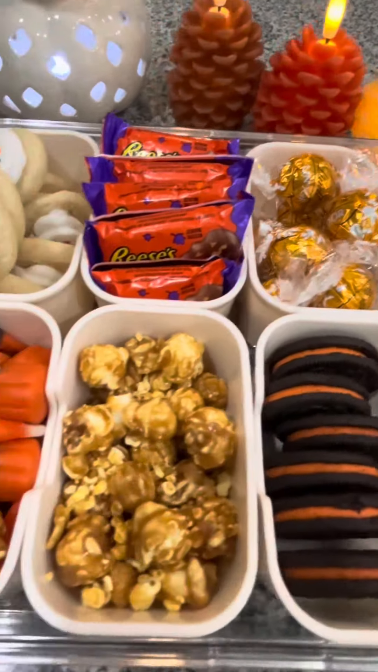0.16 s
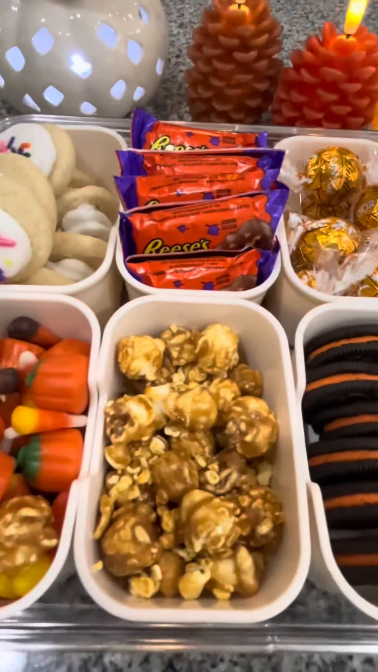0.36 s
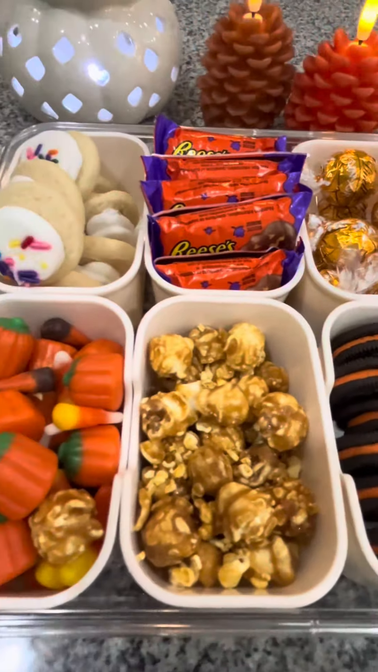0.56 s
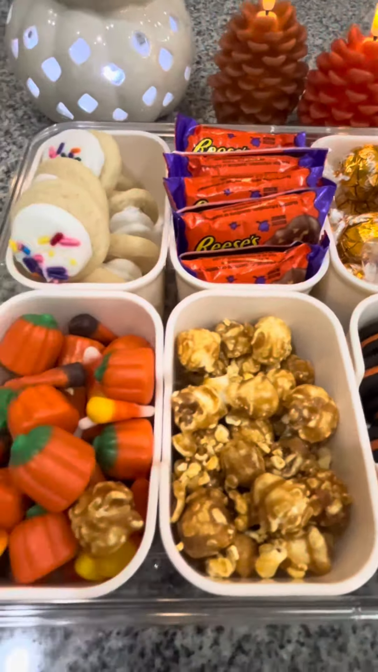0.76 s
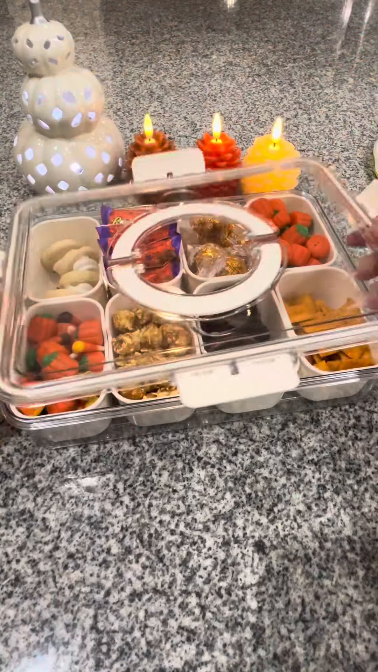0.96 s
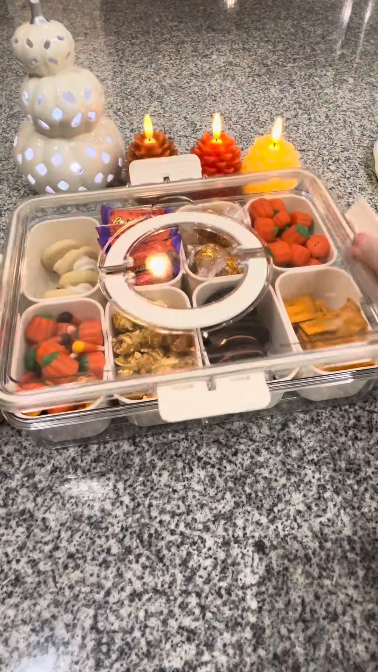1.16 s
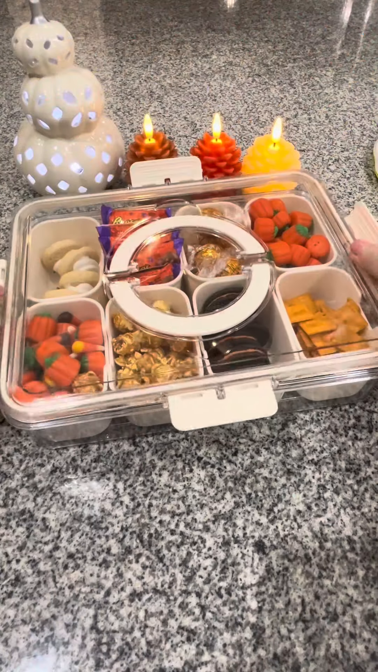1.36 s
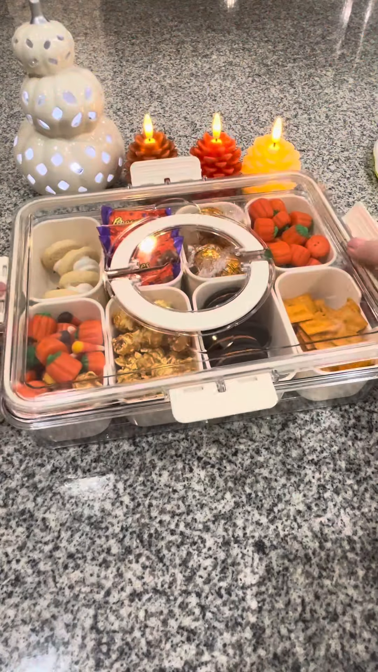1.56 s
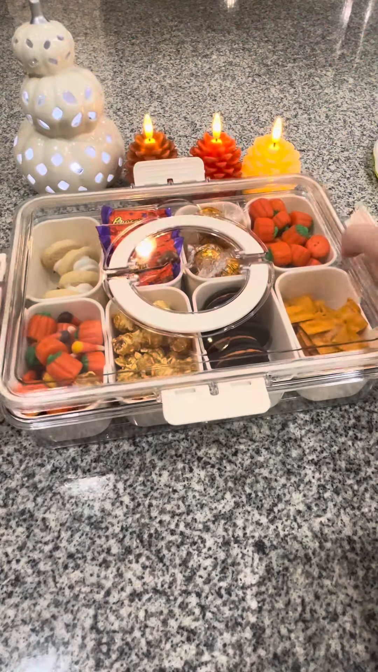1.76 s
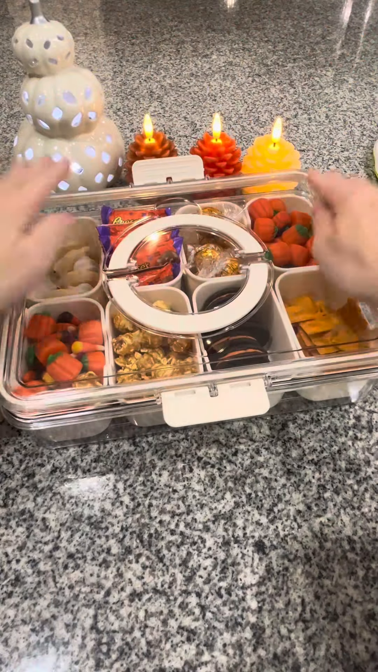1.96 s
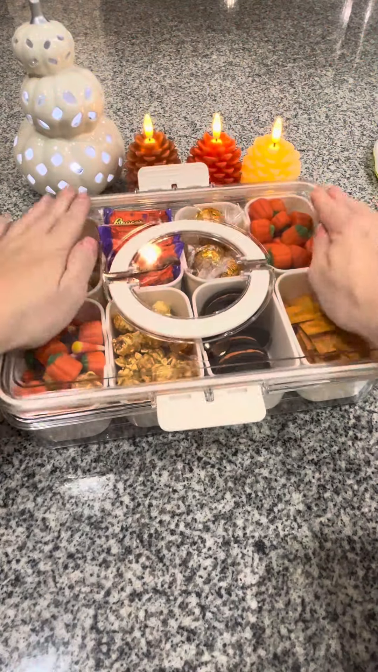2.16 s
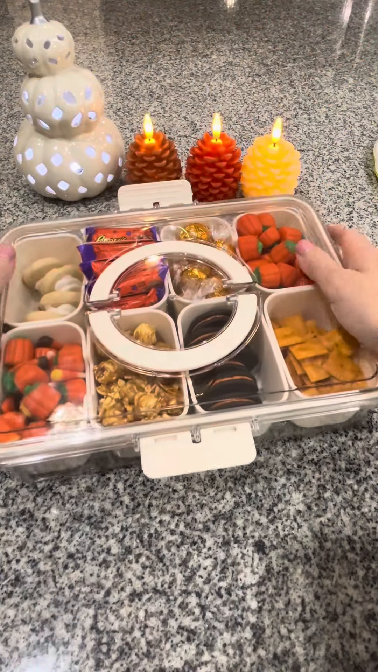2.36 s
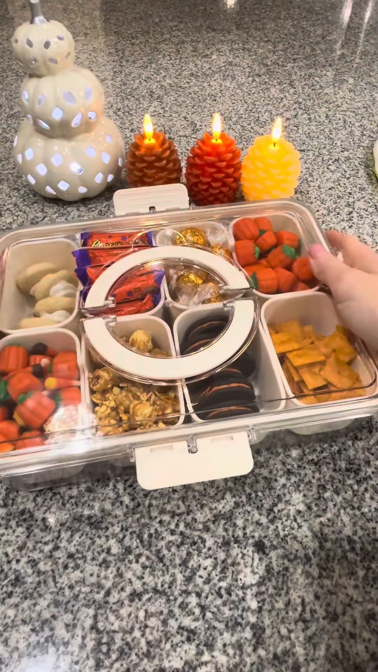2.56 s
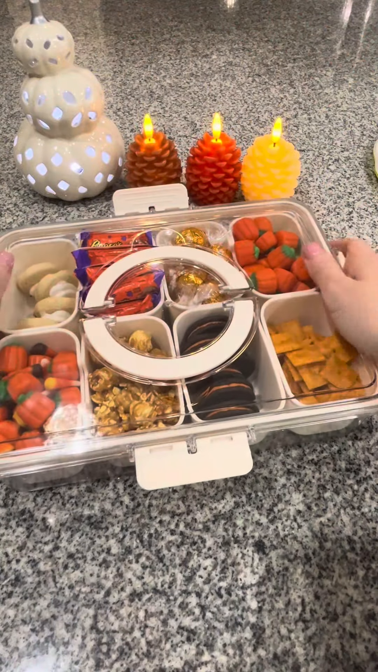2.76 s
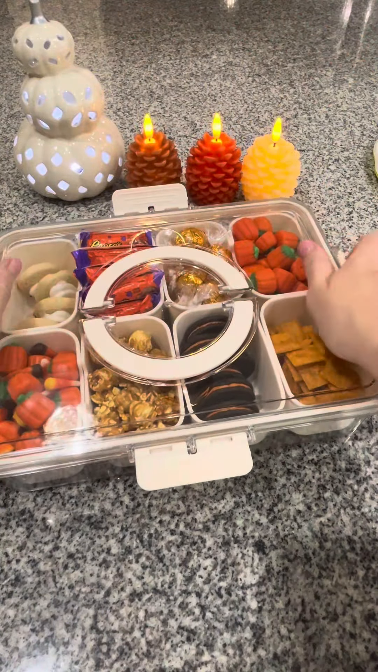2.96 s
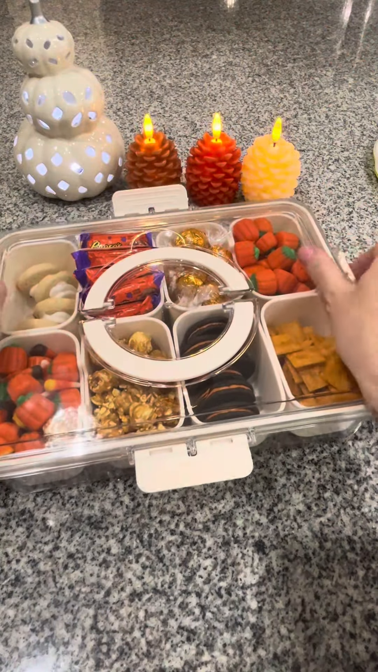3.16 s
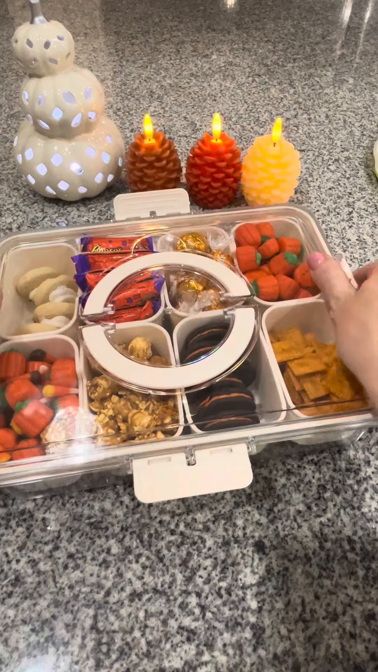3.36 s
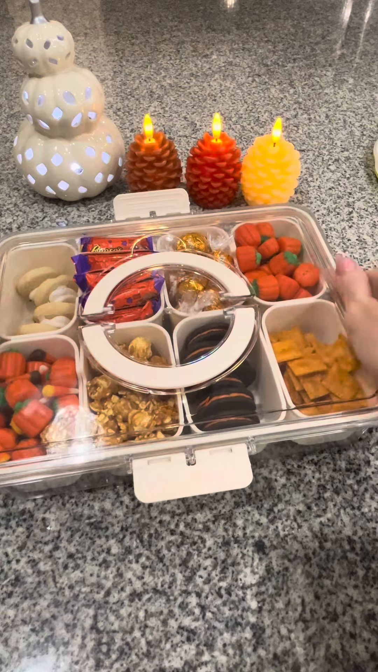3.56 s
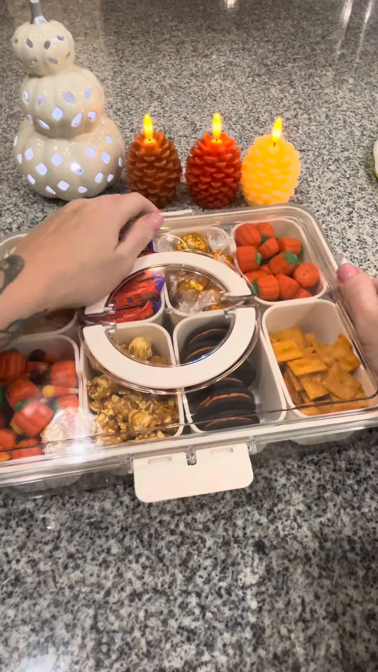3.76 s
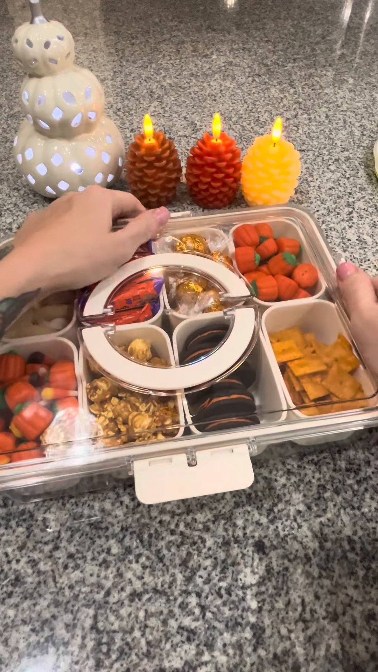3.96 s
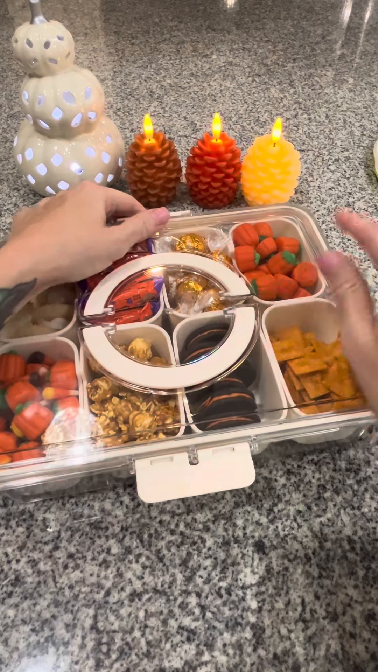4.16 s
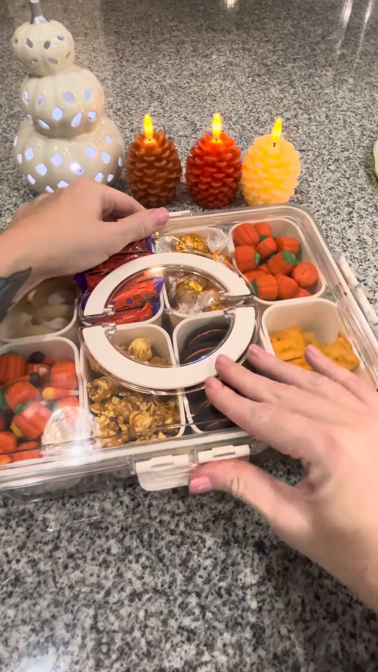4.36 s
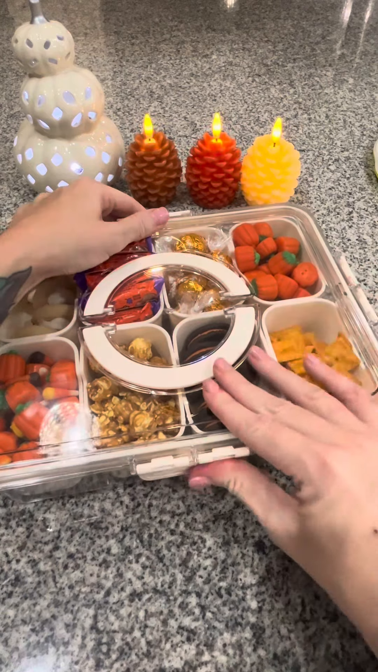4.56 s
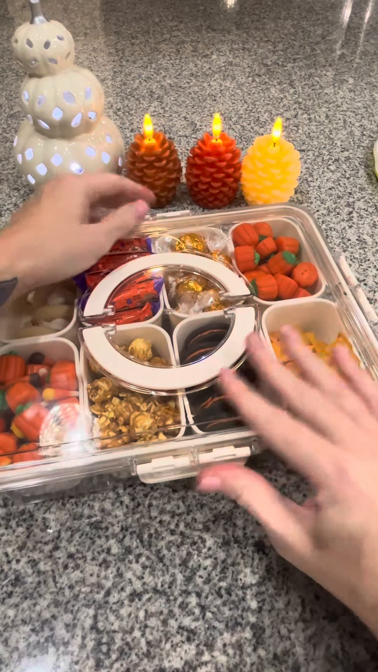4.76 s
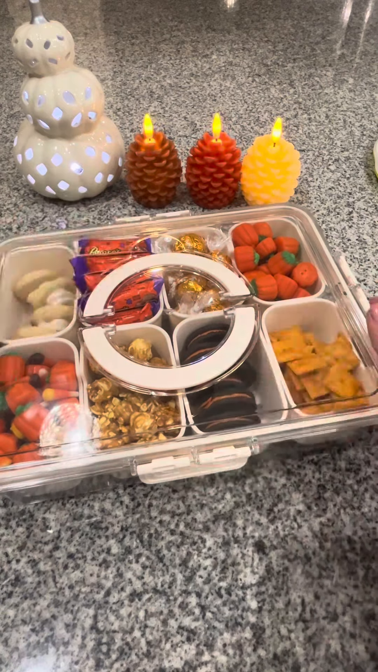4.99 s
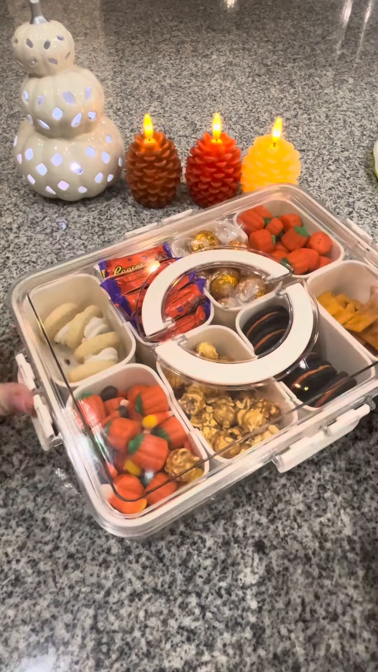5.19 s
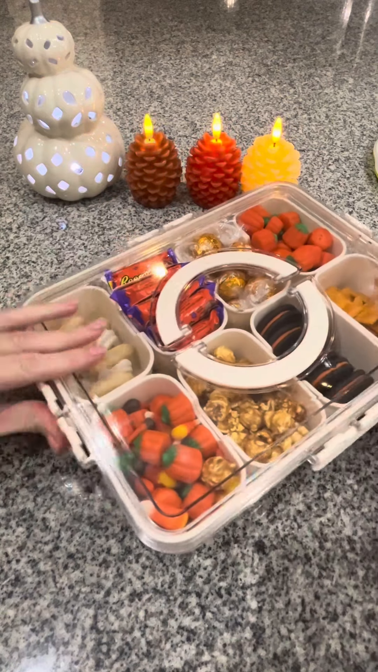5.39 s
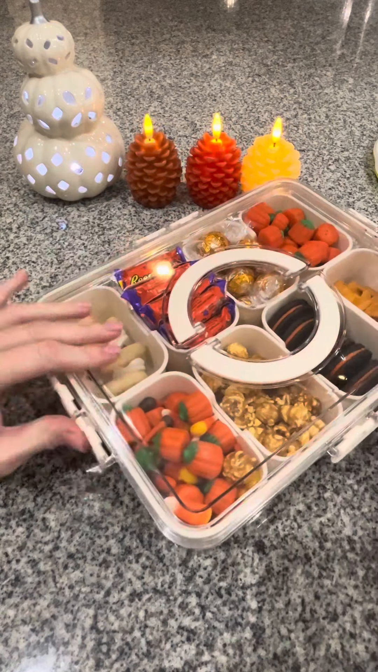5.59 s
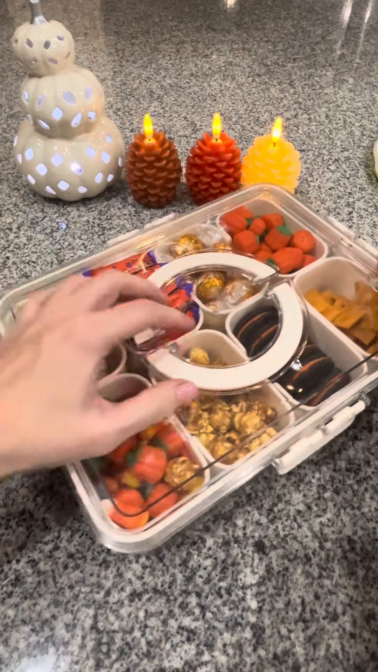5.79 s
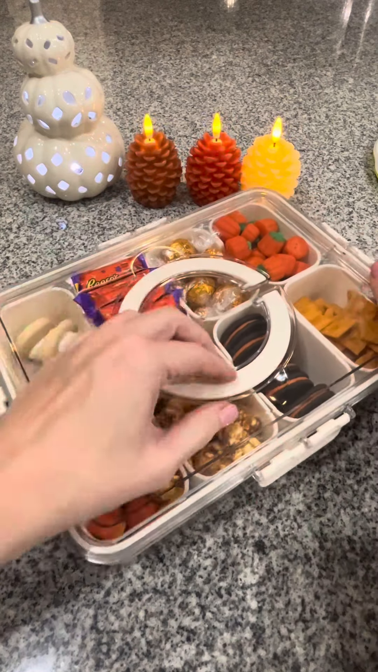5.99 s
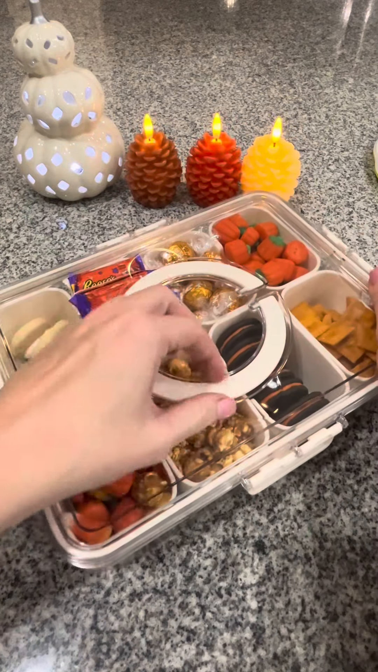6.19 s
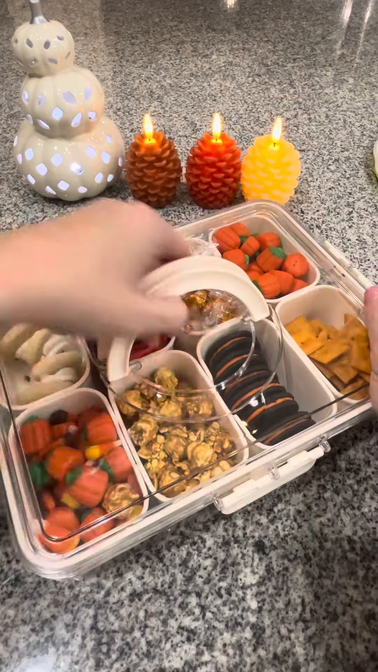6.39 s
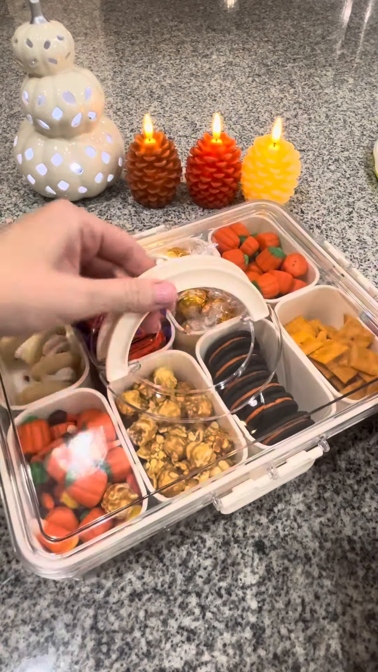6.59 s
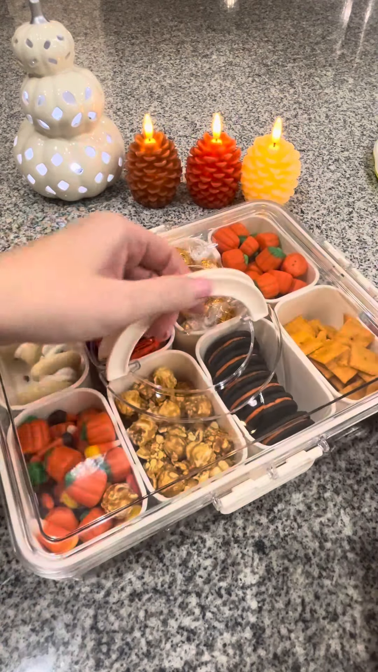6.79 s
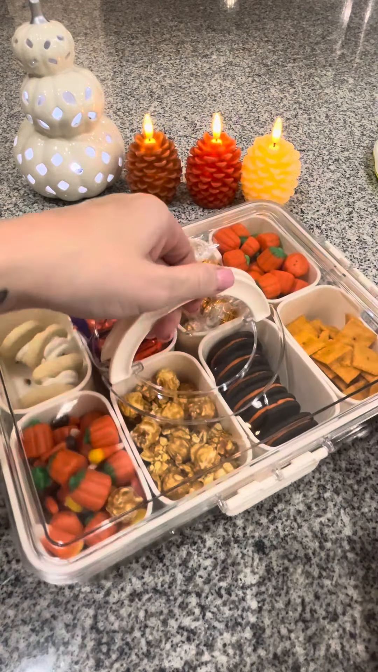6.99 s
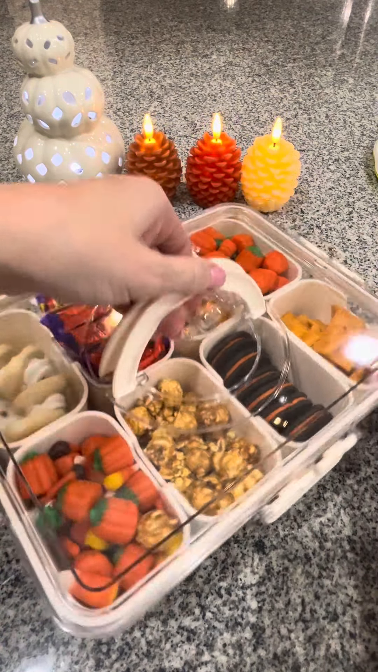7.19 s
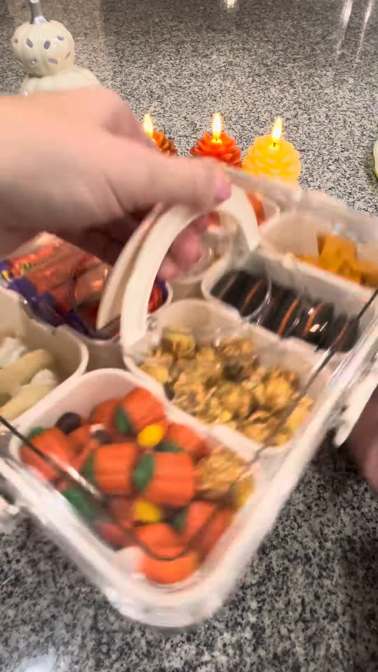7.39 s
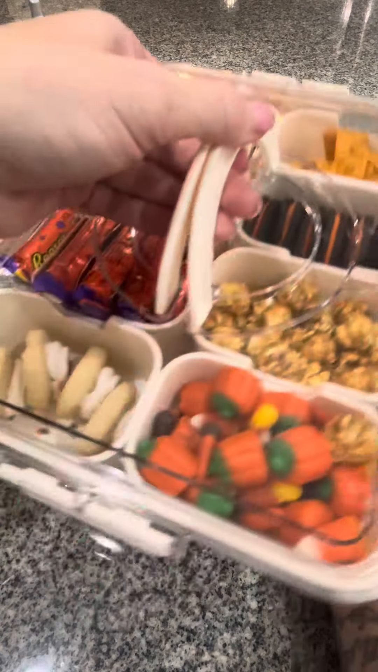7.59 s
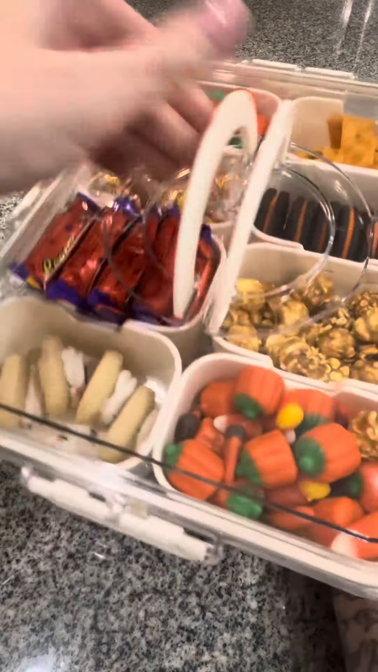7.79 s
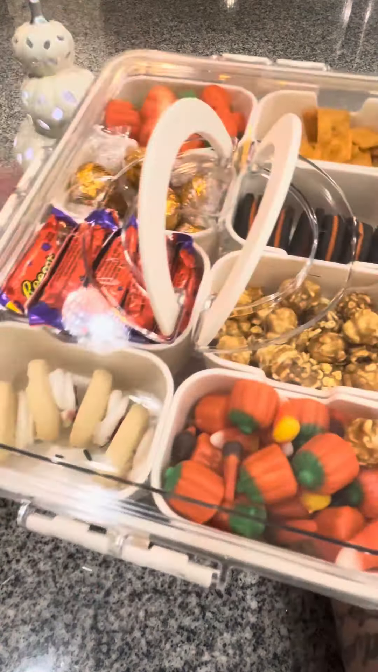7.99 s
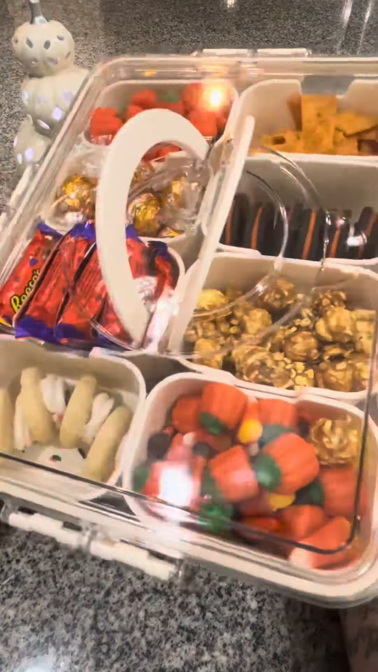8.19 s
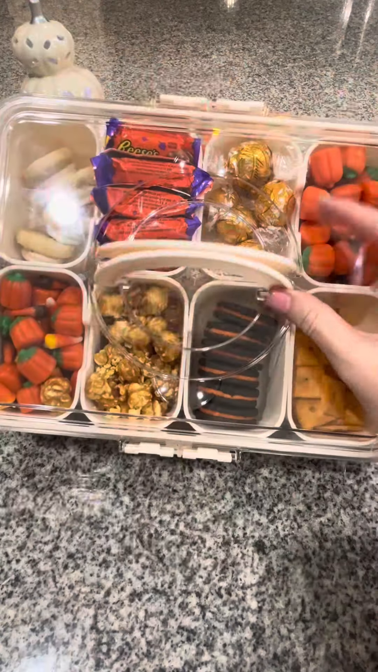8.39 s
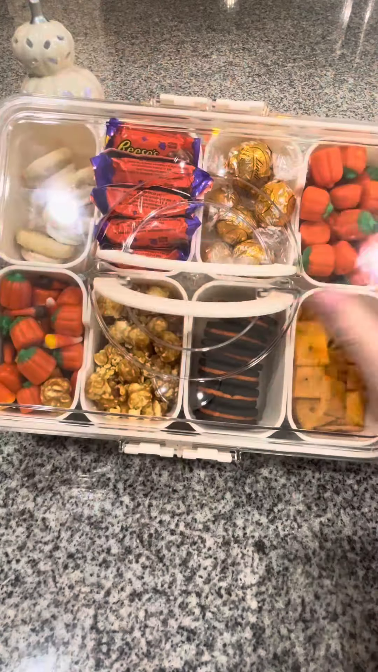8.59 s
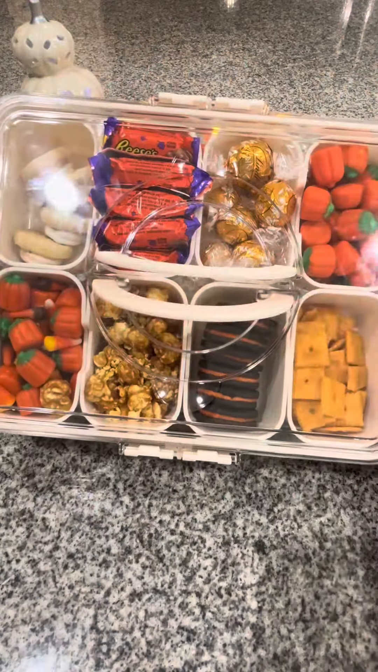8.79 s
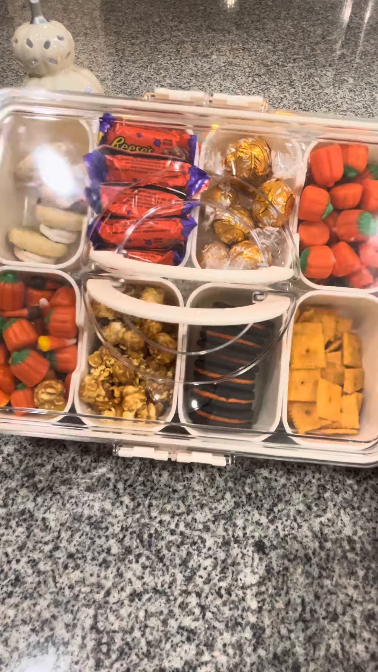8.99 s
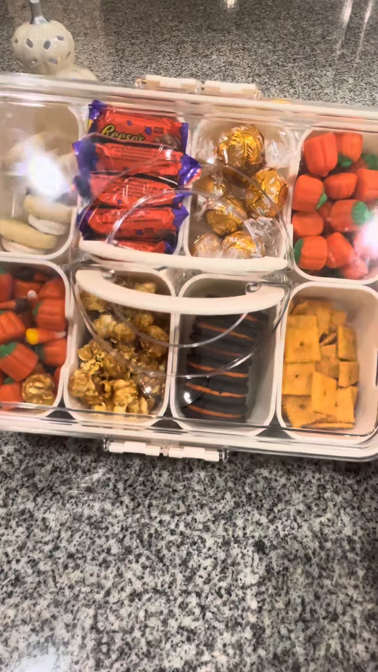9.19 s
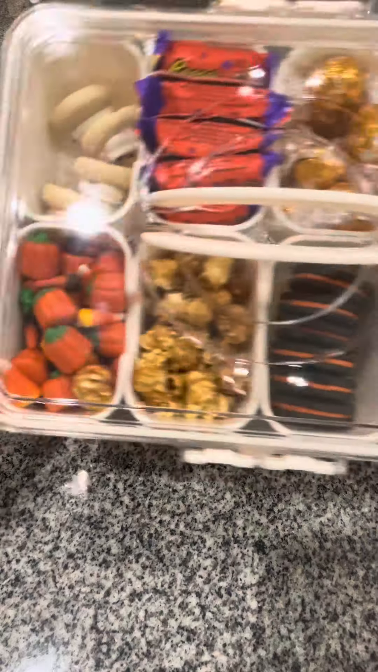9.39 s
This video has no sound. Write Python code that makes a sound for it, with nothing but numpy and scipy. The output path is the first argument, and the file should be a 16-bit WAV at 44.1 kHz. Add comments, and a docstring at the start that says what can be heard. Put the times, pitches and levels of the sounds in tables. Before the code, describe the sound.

A hard plastic box lid is wiggled on and latched with loud snaps, then the box is turned, lifted and set down in a quiet kitchen.

```python
"""A clear plastic snack box on a stone counter, close to a phone in a quiet kitchen. Its lid is laid on and
wiggled home, its latches snap shut, it is turned and lifted by its folding handles, then set down again.
Each contact flexes the box (a falling knock), sounds a wall mode (clack), and cracks and rings its thin
shell (click). Rubbing is a dense run of tiny noise slips. Decaying noise is the room's answer; coloured
noise and a wavering sine are the low rumble and hum behind it."""
import sys
import numpy as np
from scipy import signal
from scipy.fft import rfft, irfft
from scipy.io import wavfile
from scipy.ndimage import uniform_filter1d

SR = 44100
rng = np.random.default_rng(int(sys.argv[2]) if len(sys.argv) > 2 else 0)


def bounce(signal):
    """Save signal as a 16-bit WAV file at the path given by the first command-line argument."""
    frames = np.transpose(np.atleast_2d(signal))
    limited = np.clip(frames, -1, 1)
    pcm = np.round(limited * 32767).astype(np.int16)
    wavfile.write(sys.argv[1], SR, pcm)


N = 416744
TIME = np.arange(N) / SR
CONTACT_SAMPLES = 4096
AGE = np.arange(CONTACT_SAMPLES) / SR  # seconds since the touch

# Strokes of rubbing on stone, plastic and skin. Each row: start in seconds, end in seconds, scrape in dB,
# hiss in dB, hiss centre in Hz, spread of slip sizes in dB (skin is smooth, plastic crackles).
STROKES = [(0.892, 1.008, -70.5, -72, 7140, 3), (0.879, 1.008, -65, -80, 2300, 5),
           (1.095, 1.219, -50.5, -53, 5000, 3.5), (1.172, 1.248, -42.5, -55, 5195, 8),
           (1.237, 1.505, -53.5, -68, 4800, 8), (1.469, 1.809, -51, -67, 4000, 8.5),
           (1.922, 2.073, -33, -44.5, 6000, 6), (2.045, 2.21, -45.5, -78, 4500, 5.2),
           (2.253, 2.516, -54.5, -72, 3810, 1.8), (2.597, 3.009, -54, -72, 3360, 4),
           (3.04, 3.219, -52, -68, 2198, 5), (3.132, 3.237, -47, -61, 7000, 5.3),
           (3.399, 3.538, -52.5, -75, 7940, 1.6), (3.553, 3.742, -47, -64, 6910, 2.4),
           (3.944, 4.154, -52, -69, 3500, 3.7), (4.057, 4.11, -58.5, -61.5, 3114, 5),
           (4.049, 4.133, -65, -66.5, 7870, 4), (4.454, 4.851, -55, -73.5, 3290, 2.4),
           (4.645, 4.765, -62, -71.5, 7900, 2), (4.722, 5.014, -65.5, -77.5, 3320, 4),
           (4.823, 4.936, -69, -72, 7980, 2), (4.955, 5.095, -50, -70, 8000, 2),
           (5.152, 5.362, -54, -74, 4500, 2.2), (5.35, 5.73, -45, -66.5, 3482, 4.9),
           (5.709, 5.938, -55.5, -78, 4700, 5), (6.158, 6.541, -56, -65.5, 4630, 5.6),
           (6.333, 6.518, -51.5, -62, 8400, 2.5), (6.479, 6.971, -61, -88, 3300, 2.3),
           (6.612, 6.863, -71, -72, 9000, 2.8), (6.832, 7.05, -63, -82.5, 4200, 2.7),
           (7.279, 7.628, -59.5, -72.5, 1500, 4.3), (7.633, 7.77, -56.5, -68.5, 9500, 2),
           (7.789, 7.881, -56.5, -87, 1290, 2.6), (8.896, 9.009, -62.5, -85, 7000, 2)]


def undb(db):
    """Decibels to gain."""
    return 10 ** (np.asarray(db) / 20)


def unit(x):
    """Scale to rms 1."""
    return x / np.sqrt(np.mean(x ** 2) + 1e-20)


def along(points, size, axis=1):
    """One column of a frequency table, read at the bins of a transform on a log-frequency scale."""
    table = np.array(points, float)
    bins_hz = np.fft.rfftfreq(size, 1 / SR)
    return np.interp(np.log(bins_hz + 1), np.log(table[:, 0]), table[:, axis])


def colour(x, points):
    """Filter by a (Hz, dB) spectrum."""
    size = x.shape[-1]
    return irfft(rfft(x) * undb(along(points, size)), size)


def band(x, low_hz, high_hz):
    """Causal band-pass."""
    return signal.sosfilt(signal.butter(2, [low_hz, high_hz], "band", fs=SR, output="sos"), x)


def walk(rate_hz):
    """Smooth random drift of spread near 1."""
    hold = int(SR / rate_hz)
    steps = np.repeat(rng.standard_normal(N // hold + 1), hold)
    return 1.3 * uniform_filter1d(steps, hold)[:N]


def stereo_noise(size, apart_db=-5):
    """Two noises that are mostly alike: the wide shell radiates a little differently towards each port."""
    common, left, right = rng.standard_normal((3, size))
    return common + undb(apart_db) * np.array([left, right])


def blow(x, db):
    """Give a strike the energy of a 14 ms burst at this rms level."""
    energy = np.sum(x ** 2, axis=-1, keepdims=True)
    return undb(db) * x / np.sqrt(energy / (.014 * SR) + 1e-20)


def add(bus, s, sound):
    """Mix in a sound that touches at s seconds; any lead-in comes before that."""
    start = int(s * SR) + CONTACT_SAMPLES - sound.shape[1]
    bus[:, start:start + sound.shape[1]] += sound[:, :N - start]


def background(hum_hz=61.8, hum_db=-4.5, side_db=-9, air_db=-48, air_from_hz=220):
    """Low room rumble and the slightly wavering hum of an appliance; the thin upper part stays level."""
    # Colour of the rumble. Each row: frequency in Hz, level in dB.
    rumble_colour = [(20, -37), (32, -23.5), (42, 0), (80, -3), (140, 1), (190, -12.5), (235, -6.5),
                     (290, -19.5), (400, -23.5), (520, -35.5), (800, -38), (1200, -51), (3500, -55),
                     (14000, -69)]
    # Level of the low part over time. Each row: time in seconds, level in dB.
    rumble_level = [(0, -41.5), (.82, -44), (.9, -51.5), (1.5, -47), (1.62, -39), (1.95, -43.5),
                    (2.15, -50), (4.2, -46), (4.6, -54.5), (5.7, -47.5), (7.5, -48), (9.45, -50)]
    mid = unit(colour(rng.standard_normal(N), rumble_colour))
    side = unit(colour(rng.standard_normal(N), rumble_colour))
    hum = np.sqrt(2) * np.sin(2 * np.pi * hum_hz * TIME + .25 * walk(3))
    rumble = mid + undb(side_db) * side * np.array([[1], [-1]])
    pair = undb(-1.0) * rumble + undb(hum_db) * hum
    bass = signal.sosfiltfilt(signal.butter(2, air_from_hz, fs=SR, output="sos"), pair)
    air = pair - bass
    return bass * undb(np.interp(TIME, *np.transpose(rumble_level))) + air * undb(air_db)


def kitchen(x, build_s=0.0043, alike_hz=520):
    """Hard walls and counters: a diffuse noise tail, alike on both sides in the bass and wider above."""
    # Bands of the echo. Each row: centre in Hz, 60 dB decay time in seconds, level in dB.
    echo_bands = [(118, 0.52, 5), (303.3, 0.53, -1), (510, 0.33, -3), (800, 0.41, 1), (1040, 0.58, -3.5),
                  (1520, 0.34, -3), (2080, 0.39, -3), (3830, 0.46, -6.5), (7900, 0.31, -7.5),
                  (14000, 0.34, -14.5)]
    size = SR * 4 // 5
    t = np.arange(size) / SR
    centres, t60s, levels = np.transpose(echo_bands)
    response = 0
    for hz, t60, db, share in zip(centres, t60s, levels, np.eye(len(echo_bands))):
        weight = np.sqrt(along(np.c_[centres, share], size))
        mid, side = irfft(rfft(rng.standard_normal((2, size))) * weight, size)
        width = min(hz / alike_hz, 1.4) ** 2 / 2
        pair = np.array([mid + width * side, mid - width * side]) / np.sqrt(1 + width ** 2)
        fade = undb(-60 * t / t60) * (1 - np.exp(-(t / build_s) ** 2))
        response = response + undb(db) * pair * fade / np.sqrt(np.sum(fade ** 2))
    return signal.fftconvolve(x[None], response, axes=1)[:, :N]


def ports(x):
    """The near box reaches the two microphone ports with different delay and shading."""
    # Each row: frequency in Hz, left minus right in dB, phase by which left leads in radians.
    port_table = [(100, -2.2, -1.5), (277, 1, 0.5), (490, 7.5, -0.65), (795, -2, -2), (1100, -1, 1.33),
                  (1580, -1, 0.85), (2670, -4.5, 2.5), (4530, -5.5, 2), (6830, 0, 5), (14300, -0.5, 4)]
    lean_db, lead = along(port_table, N, axis=1), along(port_table, N, axis=2)
    left = undb(lean_db / 2) * np.exp(.5j * lead)
    right = undb(-lean_db / 2) * np.exp(-.5j * lead)
    pair = np.array([left, right])
    return irfft(rfft(x) * pair / np.sqrt(np.mean(abs(pair) ** 2, axis=0)), N)


def dry_tick(tick_s=8.1992, tick_db=-59, weakens_above_hz=900):
    """One bare, very sharp tick with no ring and no echo, the same on both sides."""
    bus = np.zeros((2, N))
    add(bus, tick_s, blow(np.exp(-2 * np.pi * weakens_above_hz * AGE), tick_db)[None])
    return bus


def shell_ring(decay, scatter_db=4):
    """The thin shell rings with a different mix of modes at each spot."""
    # Each row: mode in Hz, level in dB, multiple of the shell decay.
    shell_modes = [(2927, 3.5, 1.5), (3720, -16.5, 1.5), (4560, -6, 1.5), (4930, 0.5, 2.2), (4650, 6, 1.5),
                   (6570, -3.5, 1.3), (7360, -10, 1.3), (8180, -21.5, 1.2)]
    hz, db, life = np.transpose(shell_modes)[:, :, None]
    detune, size, phase = rng.standard_normal((3, len(shell_modes), 1))
    sine = np.sin(2 * np.pi * (hz * (1 + 0.0046 * detune) * AGE + phase))
    return np.sum(undb(db + scatter_db * size) * np.exp(-AGE / (decay * life)) * sine, axis=0)


def rubbing(unsteady_db=3.5, slips_per_s=1700, broad_db=-9, ring_db=-10, ring_s=.005, stroke_ease=1.4):
    """Dense tiny slips of plastic on stone, plastic and skin, heard through the box and its shell."""
    # Colour of the low scrape. Each row: frequency in Hz, level in dB.
    scrape_colour = [(150, -4.5), (300, 6.5), (450, 7.5), (650, 1), (900, -5.5), (1500, -13), (3000, -32)]
    # Colour of the broad hiss. Each row: frequency in Hz, level in dB.
    hiss_colour = [(600, -8.5), (1400, -8.5), (2300, 1.5), (4500, 2.5), (5600, -7.5), (7500, 0),
                   (10000, -9), (13000, -19.5), (16000, -25.5)]
    out, grip = np.zeros((2, N)), undb(unsteady_db * walk(35))
    size = SR // 2
    t = np.arange(size) / SR
    for start_s, end_s, scrape_db, hiss_db, hiss_hz, grain_db in STROKES:
        start = int(start_s * SR)
        happens = rng.random(size) < slips_per_s / SR
        slips = happens * undb(grain_db * rng.exponential(size=size).clip(0, 3)) * stereo_noise(size)
        broad = colour(slips, hiss_colour)
        hiss = unit(band(broad, hiss_hz / 1.8, hiss_hz * 1.2)) + undb(broad_db) * unit(broad)
        ring = signal.fftconvolve(slips, shell_ring(ring_s)[None], axes=1)[:, :size]
        hiss = hiss + undb(ring_db) * unit(ring)
        scrape = unit(colour(slips[0], scrape_colour))
        # the hand speeds up and slows down again
        speed = abs(np.sin(np.pi * np.clip(t / (end_s - start_s), 0, 1))) ** stroke_ease
        out[:, start:start + size] += speed * (undb(scrape_db) * scrape + undb(hiss_db) * hiss)
    return out * grip


def creaks(size_db=4, slip_s=.0007, spread=1.77, room_db=-11):
    """A stiff handle hinge sticks and slips: a short, uneven run of tiny clicks."""
    # Each row: start in seconds, end in seconds, level in dB, slips per second, centre in Hz.
    creak_rows = [(6.183, 6.207, -41.5, 820, 2650), (6.212, 6.221, -49, 400, 4200),
                  (6.311, 6.336, -46, 520, 3000), (6.261, 6.272, -60, 450, 2400)]
    bus = np.zeros((3, N))
    for start_s, end_s, db, slips_per_s, hz in creak_rows:
        slip_times = np.cumsum(rng.uniform(.3, 1.7, 32)) / slips_per_s
        slip_times = slip_times - slip_times[0]
        sizes = undb(size_db * rng.standard_normal(len(slip_times))) * (slip_times <= end_s - start_s)
        since = AGE - slip_times[:, None]
        envelope = sizes @ ((since > 0) * np.exp(-abs(since) / slip_s))
        pair = blow(band(stereo_noise(CONTACT_SAMPLES) * envelope, hz / spread, hz * spread), db)
        add(bus, start_s, np.vstack([pair, undb(room_db) * pair[0]]))
    return bus


def knock(hz, decay, modes=None, sweep=.9, sweep_s=0.0016):
    """A panel flexes; short bending waves arrive first, so the pitch falls as the knock swells and dies."""
    if modes is None:
        # Flexing of the closed box. Each row: multiple of the knock pitch, level in dB,
        # multiple of the knock decay.
        modes = [(0.331, -18, 1.5), (.66, -4, 1.3), (.84, -2, 1.05), (1.25, -5.5, 1.0), (1.9, -32, .7)]
    travel = AGE + sweep * sweep_s * (1 - np.exp(-AGE / sweep_s))
    out = 0
    for ratio, db, life in modes:
        detune, size, phase = rng.standard_normal(3)
        swell = AGE / (decay * life) * np.exp(-AGE / (decay * life))
        sine = np.sin(2 * np.pi * hz * ratio * (1 + 0.038 * detune) * travel + .5 * phase)
        out = out + undb(db + size) * swell * sine
    return out


def bend(first_hz, last_hz, swell_s, ring_hz, ring_db, fall_s=.0022, steepness=3.2, ring_s=.014,
         thump_hz=235, thump_db=-13.0, thump_s=.0019):
    """A snap sends one bending wave across the lid, high pitches first; the hollow box rings on behind it."""
    hz = last_hz + (first_hz - last_hz) * np.exp(-AGE / fall_s)
    swell = (AGE / swell_s * np.exp(1 - AGE / swell_s)) ** steepness
    wave = swell * np.sin(2 * np.pi * np.cumsum(hz) / SR)
    ring = np.sin(2 * np.pi * ring_hz * AGE) * np.exp(-AGE / ring_s) * (1 - np.exp(-AGE / swell_s))
    thump = np.sin(2 * np.pi * thump_hz * AGE) * AGE * np.exp(-AGE / thump_s)  # the whole box gives way
    return unit(wave) + undb(ring_db) * unit(ring) + undb(thump_db) * unit(thump)


def clack(t, envelope, hz, spread=1.5, skirt_db=-5, mode_db=1, mode_s=0.002):
    """One wall mode, picked by where the box is touched, among its crowded neighbours."""
    burst = stereo_noise(len(t)) * envelope
    crowd = band(burst, hz / spread, hz * spread) + undb(skirt_db) * band(burst, 640, 3600)
    mode = np.sin(2 * np.pi * hz * t) * np.exp(-t / mode_s) * (1 - np.exp(-t / 0.0018))
    return unit(crowd) + undb(mode_db) * unit(mode)


def click(envelope, decay, ring_db):
    """The plastic cracks, and the shell rings."""
    # Colour of the crack. Each row: frequency in Hz, level in dB.
    crack_colour = [(1500, -20.5), (2400, 1), (3200, 7), (4400, 12), (5500, 4.5), (7200, 1.5), (8500, 3),
                    (10000, -18), (16000, -18.5)]
    crack = colour(stereo_noise(CONTACT_SAMPLES), crack_colour) * envelope
    return unit(crack) + undb(ring_db) * unit(shell_ring(decay))


def chatter(t, decay, count=3, gap=2.6, bounce_db=-14, loss_db=-3):
    """Envelope of a contact: one touch, then mostly ever lighter ones, closer together if decay is short."""
    since = t - np.cumsum(gap * decay * (.5 + rng.random(count)))[:, None]
    sizes = undb(bounce_db + loss_db * np.arange(count) + 2 * rng.standard_normal(count))
    return np.exp(-t / decay) + sizes @ ((since > 0) * np.exp(-abs(since) / decay))


def contact(flex, knock_db, clack_db, click_db, edge_db, clack_hz, shell_s, room_db, edge=None, spread=1.7,
            mode_db=1, mode_s=0.0024, bounce_db=-14, clack_life=1.3, edge_life=.93, ring_db=-4,
            ring_life=1.3, skirt_db=-5, lead_db=-15, lead_s=0.0023, scatter_s=.014, radiates_from_hz=130):
    """One tap, snap or knock: left, right, and the part that is thrown into the room."""
    if edge is None:
        # Tick of a hard edge. Each row: frequency in Hz, level in dB.
        edge = [(5500, -20), (7000, 5), (8300, 1.5), (10000, -13), (12000, 4), (14000, -4.5),
                (16000, -12.5)]

    def shell(envelope, ring_db):
        """The bright part of this contact; its clack and its tick fade at rates of their own."""
        wall = clack(AGE, envelope ** (1 / clack_life), clack_hz, spread, skirt_db, mode_db, mode_s)
        bright = click(envelope, shell_s * ring_life, ring_db)
        tick = colour(stereo_noise(CONTACT_SAMPLES), edge) * envelope ** (1 / edge_life)
        return blow(wall, clack_db) + blow(bright, click_db) + blow(tick, edge_db)

    # below its lowest radiated pitch, air slips round the box
    high_pass = signal.butter(2, radiates_from_hz, "high", fs=SR, output="sos")
    body = blow(signal.sosfilt(high_pass, flex), knock_db)
    direct = body + shell(chatter(AGE, shell_s, bounce_db=bounce_db), ring_db)
    # nearby things scatter the bright part on its way into the room
    thrown = undb(room_db) * (body + shell(np.exp(-AGE / scatter_s), -14.5)[0])
    # the edges scrape past each other just before they meet
    lead = undb(lead_db) * shell(np.exp(-AGE / lead_s), -15)[:, ::-1]
    return np.block([[lead, direct], [np.zeros(CONTACT_SAMPLES), thrown]])


def snacks(shifts_per_s=7, shift_knock_db=-2.5, shift_click_db=-0.5, clack_db=-5, edge_db=-17):
    """Sweets and trays tick at random during rubbing, as strongly as the stroke shakes them at that moment."""
    bus = np.zeros((3, N))
    for start_s, end_s, scrape_db, hiss_db, _, _ in STROKES:
        length_s = end_s - start_s
        count = int(round(shifts_per_s * length_s))
        # knock against the scrape, click against the hiss
        knock_db, click_db = scrape_db + shift_knock_db, hiss_db + shift_click_db
        middle_db = (knock_db + click_db) / 2 + clack_db
        for place, pitch in rng.uniform(-1, 1, (count, 2)):
            s = (start_s + end_s + place * length_s) / 2
            speed = np.cos(np.pi * place / 2)
            tick = contact(knock(410 * 1.25 ** pitch, .0017), knock_db, middle_db, click_db,
                           click_db + edge_db, clack_hz=1400 * 1.25 ** pitch, shell_s=0.00094, room_db=-5.5)
            add(bus, s, speed * tick)
    return bus


def rattle(handle_hz=500, knock_db=-46, edge_db=-12):
    """The two handles clatter together as they take the weight: hardly any flex, strong in the room."""
    # Each row: time in seconds, clack in dB, click in dB.
    rattle_rows = [(7.0596, -47, -43), (7.0635, -44.5, -51), (7.0765, -33, -37), (7.0795, -37, -50.5),
                   (7.0874, -38.5, -40.5), (7.094, -47, -47), (7.0975, -43, -54)]
    bus = np.zeros((3, N))
    for s, clack_db, click_db in rattle_rows:
        add(bus, s, contact(knock(handle_hz, 0.00354), knock_db, clack_db, click_db, click_db + edge_db,
                            clack_hz=1340, shell_s=0.0022, room_db=-3.0, spread=2.1, mode_db=-10.0,
                            bounce_db=-14.5, ring_db=-10, lead_db=-18))
    return bus


def hollow_taps(rim_hz=344, edge_db=-14):
    """A light handle or tray drops against the box: a dry, hollow clack with little treble."""
    # Each row: time in seconds, knock in dB, clack in dB, click in dB, clack centre in Hz, ring in seconds.
    tap_rows = [(2.8314, -48.5, -62, -75, 1920, .003), (3.1383, -41, -44.5, -56, 1390, .003),
                (3.171, -40.5, -48.5, -65.5, 1420, .003), (4.72, -49, -51, -63, 1710, .0013),
                (6.202, -44.5, -49, -48, 1280, .0012), (6.352, -63, -58, -70, 1900, .002),
                (6.3939, -38, -41.5, -55.5, 1630, .0012), (6.6185, -47, -49, -67.5, 1410, 0.0017),
                (7.679, -45, -53.5, -71, 1380, 0.0016), (7.7447, -54, -63, -82, 1280, .002),
                (7.7636, -46, -39, -72, 844, .003), (7.8246, -32, -50.5, -76, 1410, .006),
                (7.8407, -31, -50.5, -74, 1440, 0.0054), (8.147, -57, -67, -75, 2200, .0013),
                (8.2101, -44, -55, -71, 1448, .002), (8.223, -47.5, -53, -78, 1050, 0.0028),
                (8.391, -55.5, -66.5, -88, 1093, 0.0022), (8.5014, -51, -55.5, -64, 1490, 0.0014),
                (9.031, -55, -80.5, -98, 1142, .003)]
    bus = np.zeros((3, N))
    for s, knock_db, clack_db, click_db, clack_hz, ring_s in tap_rows:
        add(bus, s, contact(knock(rim_hz, .0043), knock_db, clack_db, click_db, click_db + edge_db,
                            clack_hz=clack_hz, shell_s=0.0026, room_db=-11.5, spread=1.4, mode_db=3.5,
                            mode_s=ring_s, skirt_db=-26.5, lead_db=-20))
    return bus


def clicks():
    """Hard edges of rim, latch flaps and handles meet lightly: a sharp click over a small, short knock."""
    # Each row: time in seconds, knock in dB, clack in dB, click in dB, edge tick in dB, knock pitch in Hz.
    click_rows = [(0.4575, -81, -77, -82, -92, 397), (0.7342, -76, -72, -77, -93, 403),
                  (0.836, -58, -67, -73, -79, 404), (0.857, -54, -66, -64, -74.5, 342),
                  (.884, -53.5, -61.5, -55, -73, 399), (2.221, -34.5, -36, -37, -47, 399),
                  (2.23, -32.5, -37.5, -38.5, -45, 383), (2.312, -54, -61, -60, -57, 332),
                  (2.6863, -31.5, -43.5, -44.5, -52.5, 335), (2.895, -52.5, -60.5, -73.5, -85, 398),
                  (3.0747, -43.5, -57.5, -67.5, -67.5, 336.4), (3.19, -47, -60.5, -59, -58, 400),
                  (3.659, -55, -52, -49.5, -64.5, 396), (3.8796, -42, -47.5, -53, -66.5, 330),
                  (3.993, -45, -55.5, -58.5, -76, 339), (4.1147, -46, -55, -61.5, -60, 333),
                  (4.2894, -30.5, -39, -37.5, -57.5, 496), (4.295, -33, -45, -42, -62, 282.3),
                  (4.559, -43.5, -52, -57.5, -68, 409.5), (4.9576, -41, -53, -60.5, -67.5, 334.5),
                  (5.0298, -58, -58, -70.5, -71, 338.7), (5.09, -34, -37.5, -44.5, -58.5, 401),
                  (5.504, -45, -48.5, -49, -53, 335), (5.728, -32, -37, -40, -66, 347.5),
                  (5.743, -31, -42, -40, -70, 353), (5.7618, -38, -43.5, -33, -47, 341),
                  (5.8545, -25, -39.5, -34, -67, 348.3), (5.8794, -37.5, -42.5, -36, -48.5, 332.5),
                  (6.0453, -39, -58, -50, -82.5, 369.7), (6.169, -45, -48, -50.5, -83, 334),
                  (6.2222, -37, -43.5, -42.5, -63.5, 332.5), (6.2865, -63, -58, -54.5, -80, 335),
                  (6.2594, -47, -52.5, -51, -76.5, 334), (6.3093, -44.5, -49.5, -42, -79, 340.6),
                  (6.4483, -36, -45.5, -39.5, -38.5, 450.6), (6.8581, -55, -54, -60, -64.5, 340),
                  (6.921, -63, -69, -71, -81, 402), (7.685, -43, -64, -57, -54.5, 338.5),
                  (8.5007, -44.5, -52.5, -65, -61, 334.8), (8.8476, -66, -76, -82.5, -87.5, 400.3),
                  (9.233, -64, -78, -82, -90, 399.5)]
    bus = np.zeros((3, N))
    for s, knock_db, clack_db, click_db, edge_db, knock_hz in click_rows:
        add(bus, s, contact(knock(knock_hz, .0023), knock_db, clack_db, click_db, edge_db,
                            clack_hz=1340, shell_s=0.0015, room_db=-9.5, mode_db=-7))
    return bus


def bumps(edge_db=-16):
    """Dull bumps of hands and counter against the closed box: mostly knock, with a faint clack."""
    # Each row: time in seconds, knock in dB, clack in dB, click in dB, knock pitch in Hz,
    # knock decay in seconds.
    bump_rows = [(0.914, -56, -79, -78, 657, 0.0096), (.955, -54, -72.5, -68, 670, 0.0038),
                 (2.412, -45, -59.5, -82.5, 509, 0.0033), (2.6524, -43, -57.5, -57, 390, 0.0038),
                 (2.713, -38.5, -54.5, -61, 409, 0.0027), (2.7697, -26, -48, -54.5, 414, 0.0032),
                 (2.9351, -35.5, -51, -54, 412, 0.0024), (3.3595, -46, -59, -64.5, 380, 0.0047),
                 (3.44, -38.5, -57, -75, 419, 0.0043), (3.5787, -40, -51, -57.5, 380, 0.0047),
                 (3.6971, -23, -41, -51.5, 533, 0.0024), (4.3328, -31, -53, -70.5, 475.4, 0.0019),
                 (4.6806, -34, -52.5, -66, 420.7, 0.0024), (5.5415, -34, -56, -64, 329.7, 0.0022),
                 (5.572, -32.5, -53.5, -57.5, 302.2, 0.0041), (6.532, -58, -72.5, -80, 466, 0.0039),
                 (6.7017, -49, -75, -80, 473, 0.0049), (7, -50, -76, -84, 407.5, 0.004),
                 (7.302, -47, -64.5, -70.5, 472.5, 0.0034), (7.324, -44, -66, -80, 507.5, 0.0038),
                 (7.3663, -35, -55, -77.5, 441.4, .004), (7.384, -40.5, -62, -89, 431.3, 0.0027),
                 (7.555, -43.5, -64.5, -81, 250.7, 0.0039), (7.6627, -39, -60.5, -71.5, 354, 0.0044),
                 (7.831, -34, -57, -82, 330, 0.0027), (8.0827, -50.5, -62.5, -76, 280, 0.0056),
                 (8.4822, -42.5, -60, -78.5, 300.3, 0.0044), (8.947, -50, -62, -78, 398.5, 0.0047)]
    bus = np.zeros((3, N))
    for s, knock_db, clack_db, click_db, knock_hz, knock_s in bump_rows:
        add(bus, s, contact(knock(knock_hz, knock_s, sweep=.8), knock_db, clack_db, click_db,
                            click_db + edge_db, clack_hz=1150, shell_s=0.0041, room_db=-8.5,
                            mode_db=-7.5, lead_db=-19))
    return bus


def lid(edge_db=-19):
    """The loose lid is laid on and pushed home; it rings on, at a pitch that depends on where it rests."""
    # Flexing of the loose lid. Each row: multiple of the knock pitch, level in dB,
    # multiple of the knock decay.
    lid_modes = [(.75, 4, 1.0), (.96, 9, 1.3), (1.05, 0.5, 1.8), (1.3, -0.5, 1.3), (1.48, -17.5, 1.3)]
    # Each row: time in seconds, knock in dB, clack in dB, click in dB, knock pitch in Hz, clack centre in Hz.
    lid_rows = [(1.1466, -31, -35.5, -34.5, 505, 930), (1.1748, -21.5, -34, -33.5, 464, 990),
                (1.193, -31, -56, -36, 486, 1400), (1.2018, -37.5, -55, -39, 499, 1400),
                (1.152, -36, -46, -39, 512, 1200), (1.307, -32.5, -39, -44.5, 457, 1400),
                (1.322, -37.5, -54.5, -58.5, 505, 1400), (1.388, -41, -67.5, -65, 470, 990),
                (1.4196, -34, -51.5, -56.5, 437, 1000), (1.434, -31.5, -48, -60, 468, 950),
                (1.476, -48, -53.5, -56, 463, 1397), (1.4908, -37, -44, -46.5, 460, 1352),
                (1.6064, -56, -54.5, -57.5, 450, 1118), (1.625, -49.5, -60, -60.5, 440, 1400),
                (1.7418, -31.5, -37, -43.5, 451, 1400), (1.76, -35, -53.5, -47.5, 494, 1400),
                (1.9435, -27.5, -50.5, -45, 449, 1100), (1.952, -21, -28.5, -33, 483, 950),
                (2.0098, -23.5, -39.5, -25, 486, 900), (2.0178, -34, -40.5, -34, 487, 1200),
                (2.0385, -22.5, -29, -38.5, 433, 1100), (2.0855, -25, -48, -56, 399, 910),
                (2.108, -29.5, -51, -69, 424, 900)]
    bus = np.zeros((3, N))
    for s, knock_db, clack_db, click_db, knock_hz, clack_hz in lid_rows:
        add(bus, s, contact(knock(knock_hz, .0036, lid_modes, sweep=.6), knock_db, clack_db, click_db,
                            click_db + edge_db, clack_hz=clack_hz, shell_s=.003, room_db=-11, spread=2.43,
                            mode_db=-11.5, ring_db=-2.0, ring_life=1.9, lead_db=-17))
    return bus


def latches():
    """Each latch snaps over the rim with a bright tick; the box answers with a hard, falling bending wave."""
    # Tick of a latch. Each row: frequency in Hz, level in dB.
    latch_colour = [(4500, -20), (6000, -5), (7100, 7.5), (7900, 1.5), (8700, -15.5), (10500, -20.5),
                    (12000, 0), (13900, 4), (16000, -0.5)]
    # Each row: time in seconds, knock in dB, clack in dB, click in dB, edge tick in dB,
    # first and last pitch of the bending wave in Hz, its swell in seconds, clack centre in Hz,
    # hollow ring in Hz, hollow ring against the wave in dB.
    snap_rows = [(3.2414, -15, -38.5, -45.5, -62, 850, 265, 0.0035, 1330, 340, -14),
                 (3.738, -23, -23.5, -28, -28.5, 2300, 520, 0.0034, 1610, 470, -12),
                 (3.742, -21, -26, -29.5, -32, 950, 227.5, 0.0022, 1130, 330, -9.5),
                 (3.796, -12, -24.5, -30, -38, 1620, 300, 0.0046, 1223, 700, -17),
                 (4.4532, -13, -22.5, -39.5, -28.5, 1450, 290, .0038, 907, 560, -16.5),
                 (5.3352, -12, -27, -28.5, -25, 1058, 340, .003, 1485, 589, -13)]
    bus = np.zeros((3, N))
    for (s, knock_db, clack_db, click_db, edge_db, first_hz, last_hz, swell_s,
         clack_hz, ring_hz, ring_db) in snap_rows:
        wave = bend(first_hz, last_hz, swell_s, ring_hz, ring_db)
        add(bus, s, contact(wave, knock_db, clack_db, click_db, edge_db, clack_hz=clack_hz,
                            shell_s=0.00088, room_db=-8.0, edge=latch_colour, bounce_db=-16.5,
                            clack_life=2.9, mode_db=-1.5, mode_s=.002, ring_db=-8, ring_life=2.2))
    return bus


def scene():
    """The box close by, its echo in the kitchen, and the background."""
    rumble = background() * signal.windows.tukey(N, .003)  # brief fades at both ends
    rub = rubbing()
    struck = lid() + latches() + bumps() + clicks() + hollow_taps() + rattle() + creaks() + snacks()
    direct, thrown = struck[:2], struck[2]
    near = ports(direct + rub)
    echo = kitchen(thrown + undb(-0.5) * rub[0])
    return near + echo + dry_tick() + rumble


def record(dry, top_hz=16500):
    """The phone rounds the very loudest peaks and cuts the top."""
    rounded = dry / (1 + (dry / .9) ** 6) ** (1 / 6)
    return signal.sosfilt(signal.ellip(8, .2, 70, top_hz, fs=SR, output="sos"), rounded)


dry = scene()
out = record(dry)
bounce(out)
```